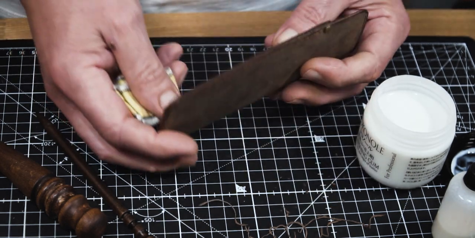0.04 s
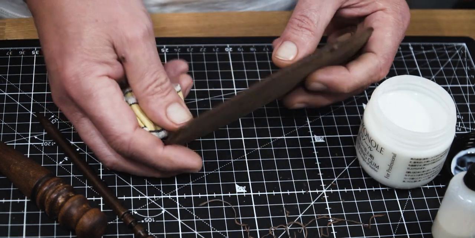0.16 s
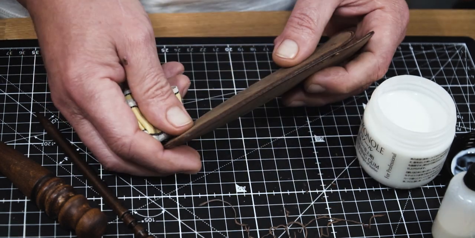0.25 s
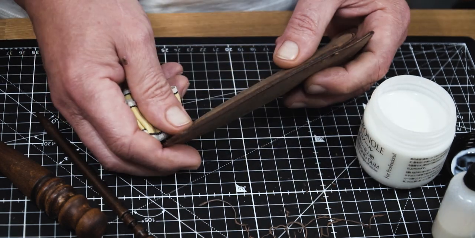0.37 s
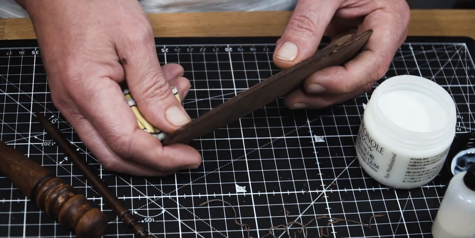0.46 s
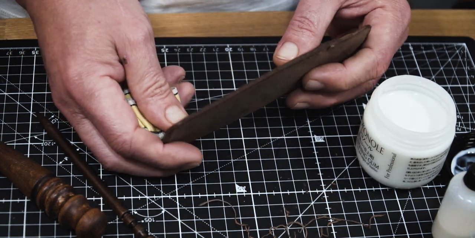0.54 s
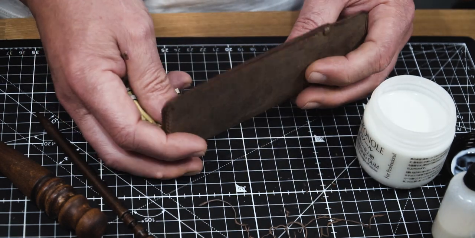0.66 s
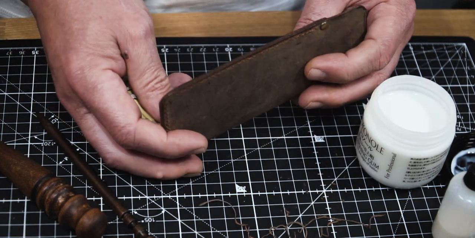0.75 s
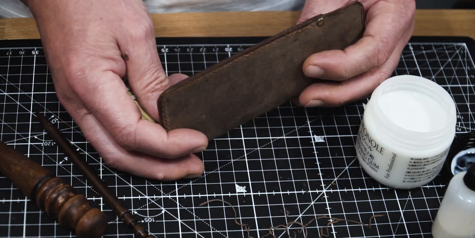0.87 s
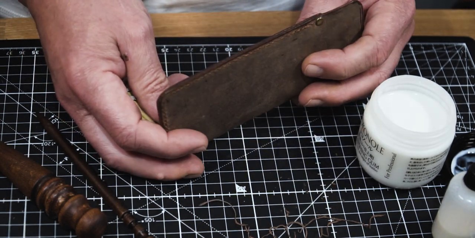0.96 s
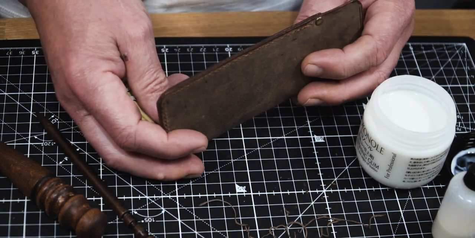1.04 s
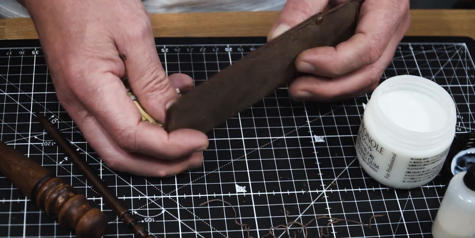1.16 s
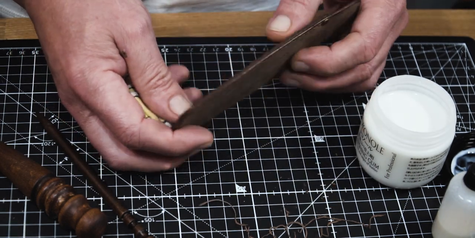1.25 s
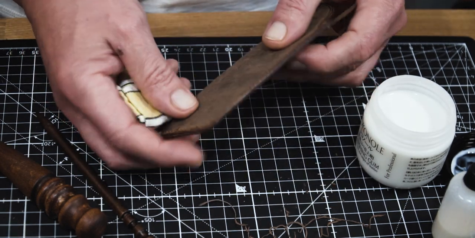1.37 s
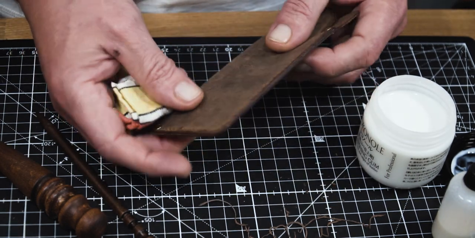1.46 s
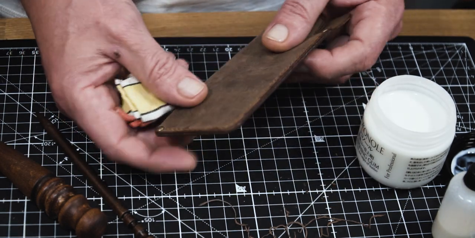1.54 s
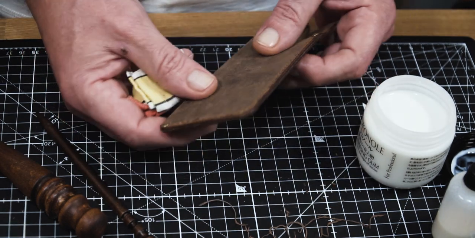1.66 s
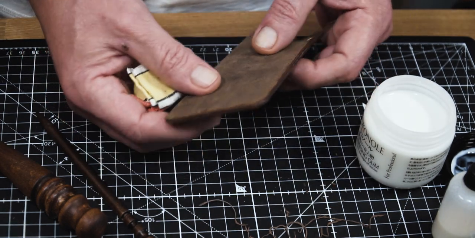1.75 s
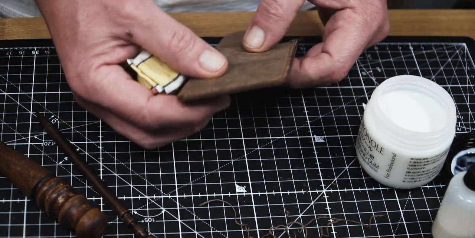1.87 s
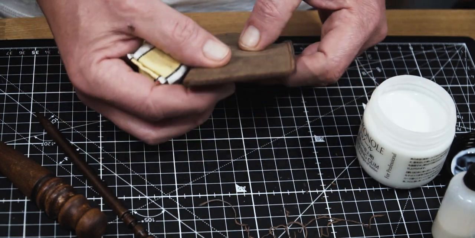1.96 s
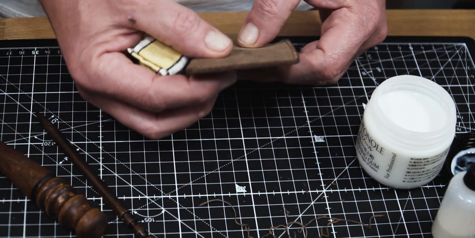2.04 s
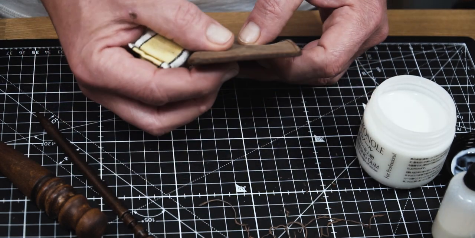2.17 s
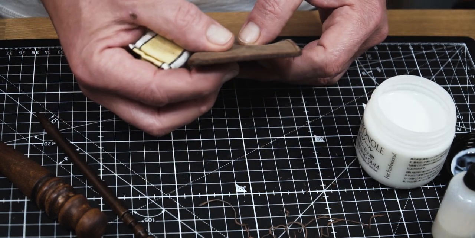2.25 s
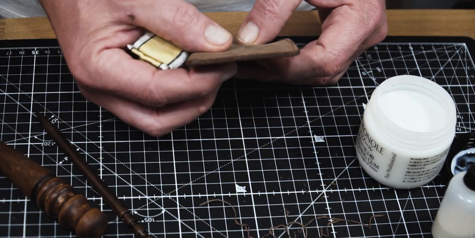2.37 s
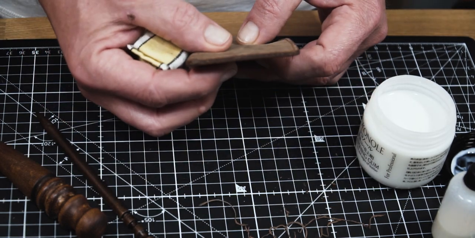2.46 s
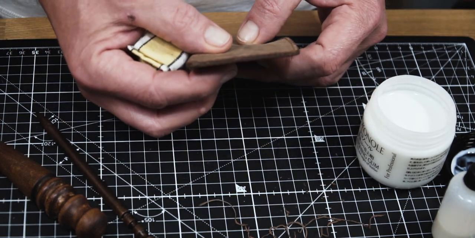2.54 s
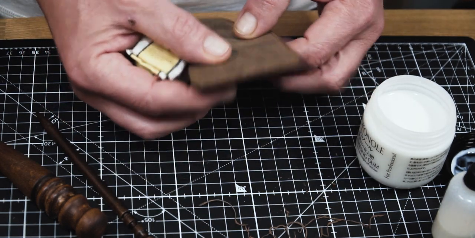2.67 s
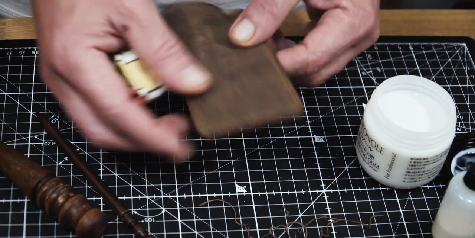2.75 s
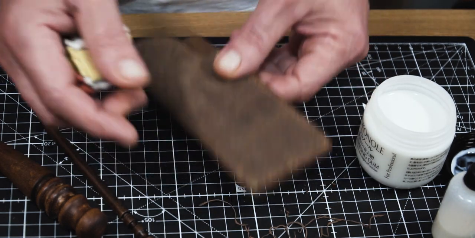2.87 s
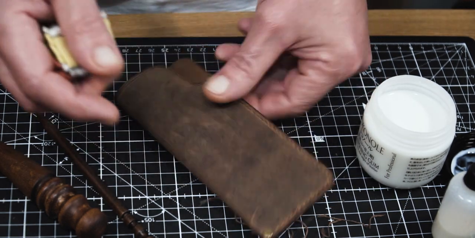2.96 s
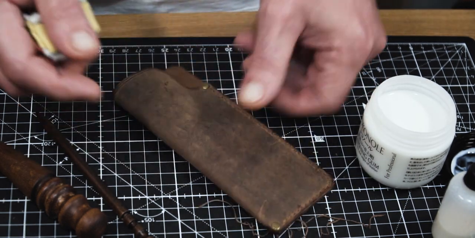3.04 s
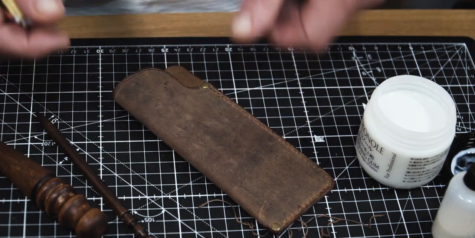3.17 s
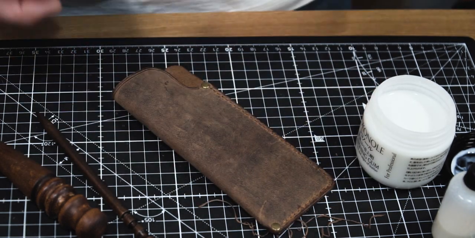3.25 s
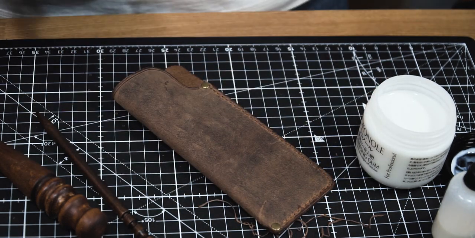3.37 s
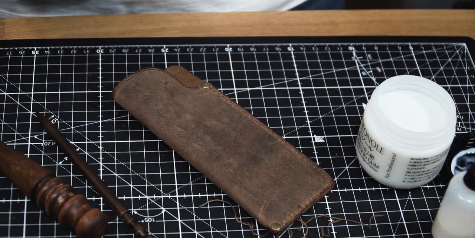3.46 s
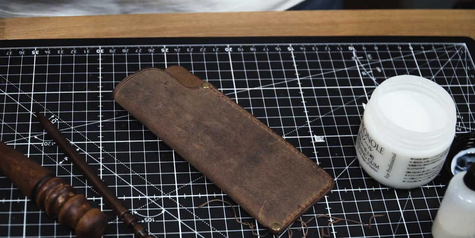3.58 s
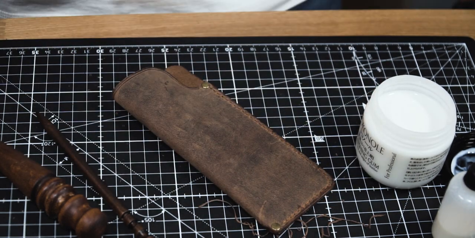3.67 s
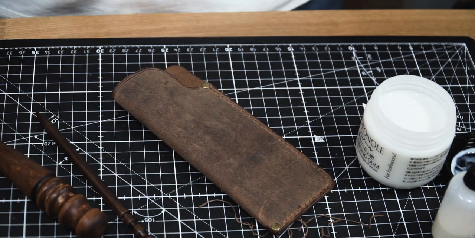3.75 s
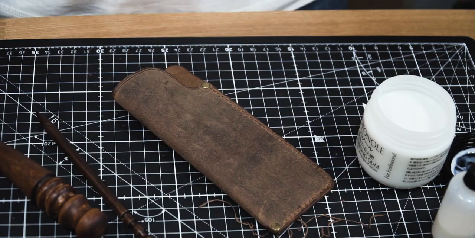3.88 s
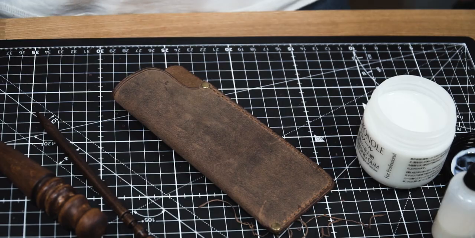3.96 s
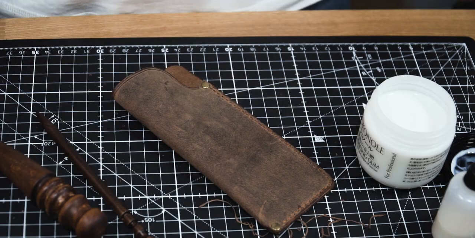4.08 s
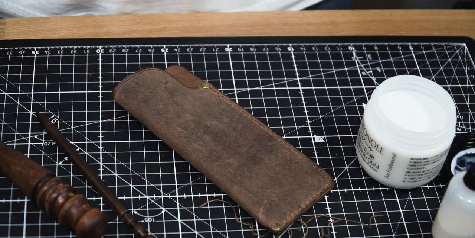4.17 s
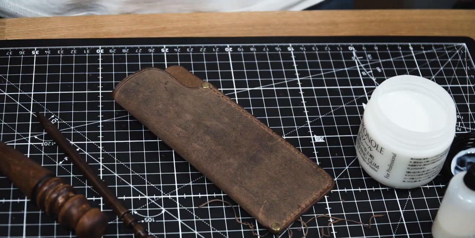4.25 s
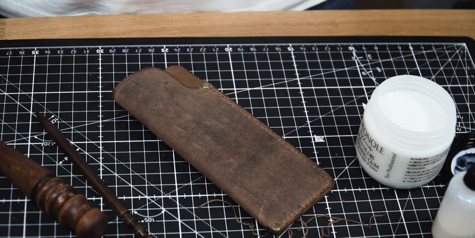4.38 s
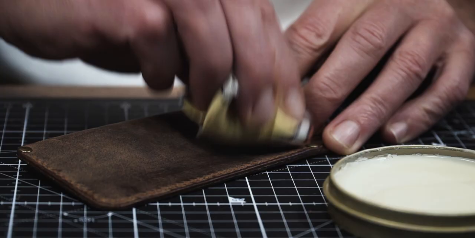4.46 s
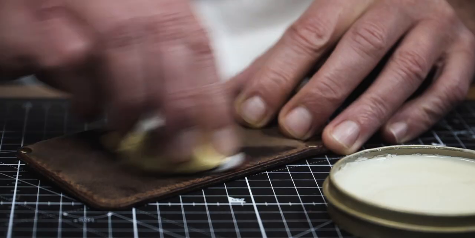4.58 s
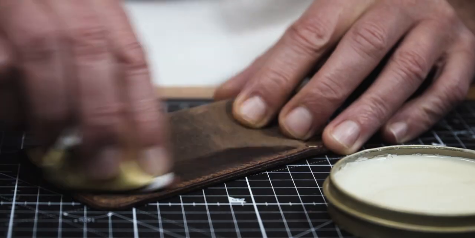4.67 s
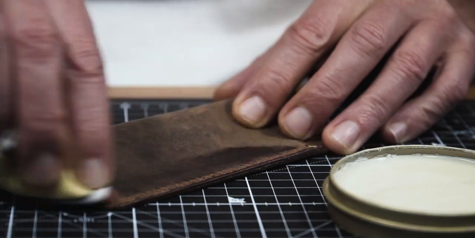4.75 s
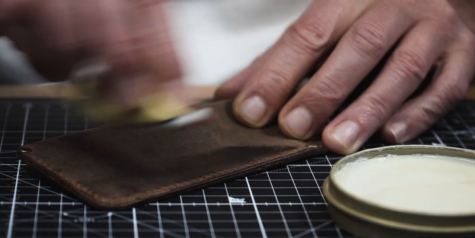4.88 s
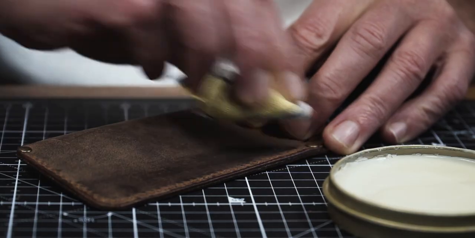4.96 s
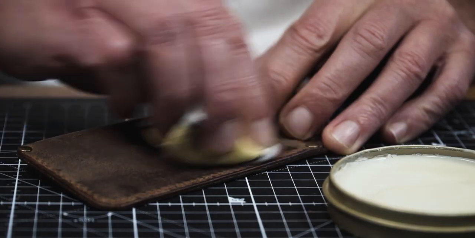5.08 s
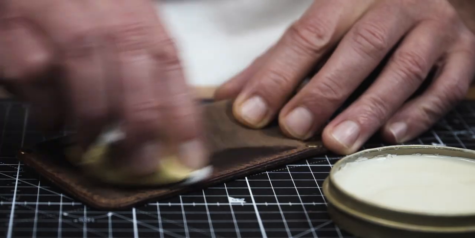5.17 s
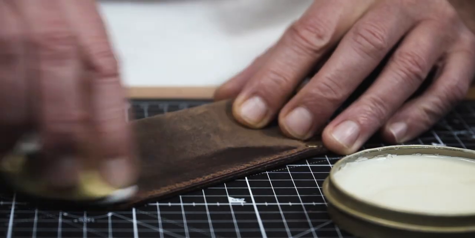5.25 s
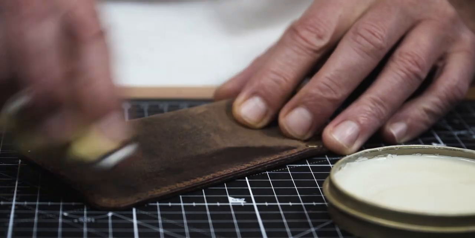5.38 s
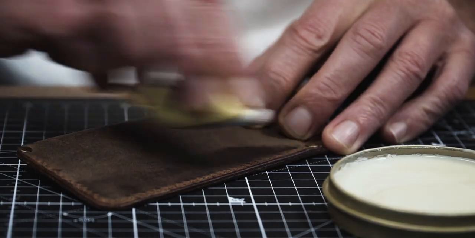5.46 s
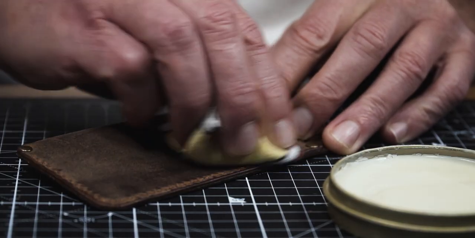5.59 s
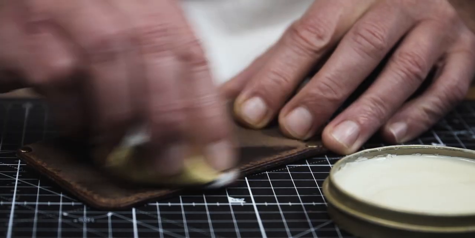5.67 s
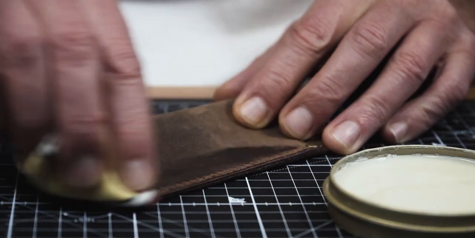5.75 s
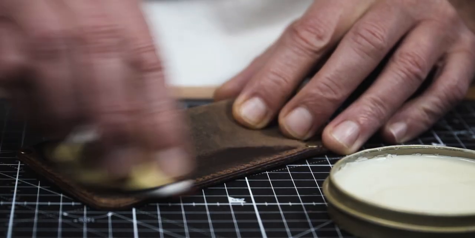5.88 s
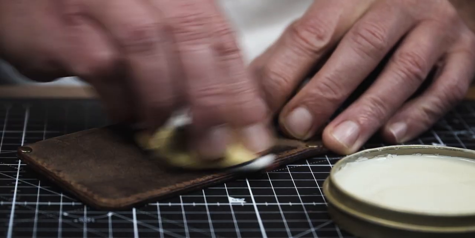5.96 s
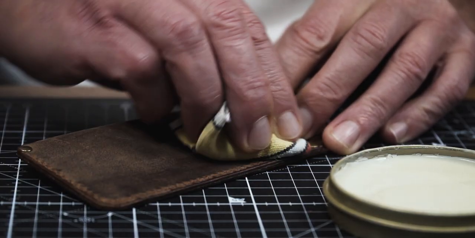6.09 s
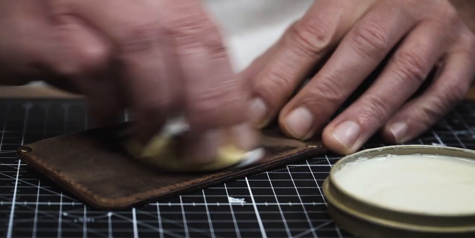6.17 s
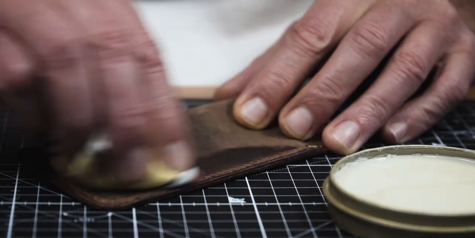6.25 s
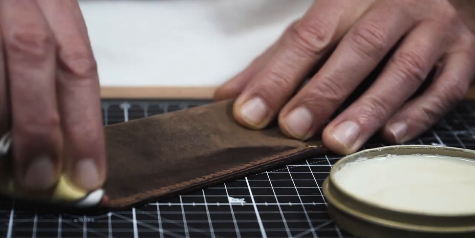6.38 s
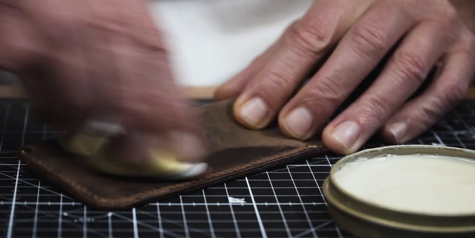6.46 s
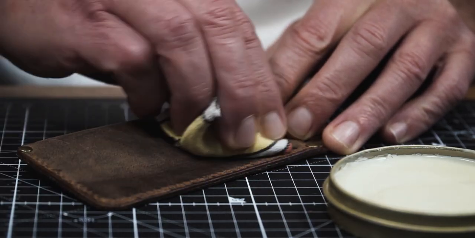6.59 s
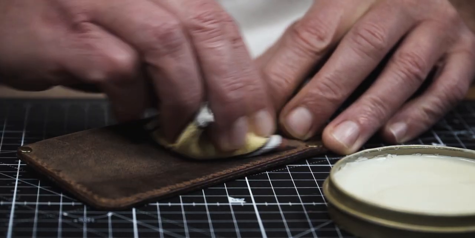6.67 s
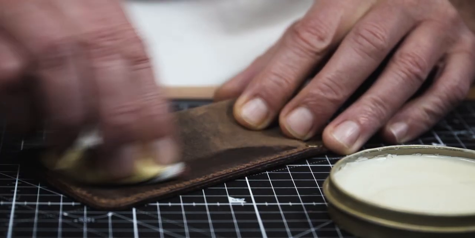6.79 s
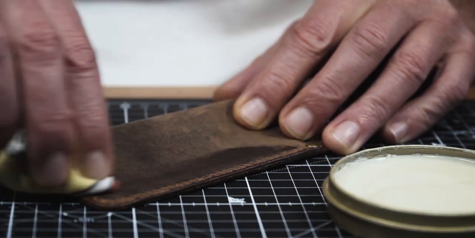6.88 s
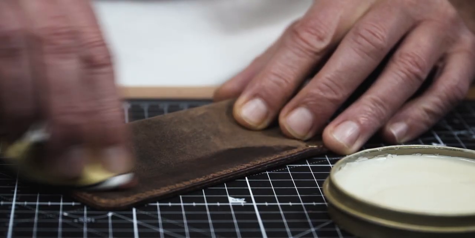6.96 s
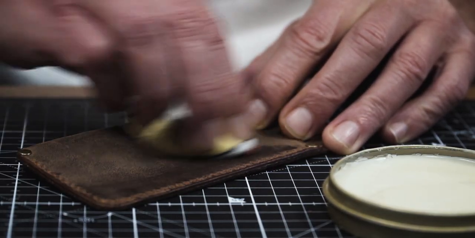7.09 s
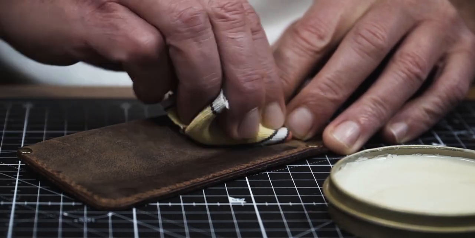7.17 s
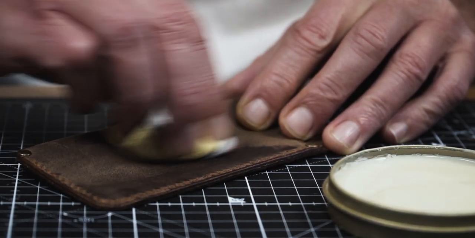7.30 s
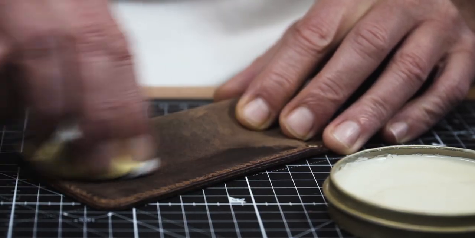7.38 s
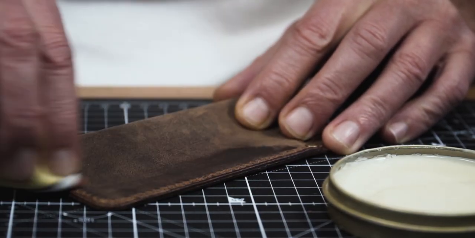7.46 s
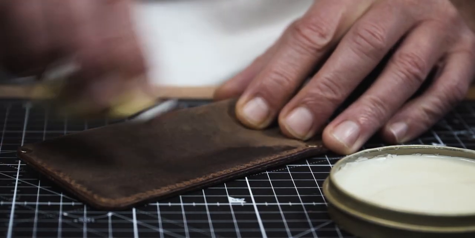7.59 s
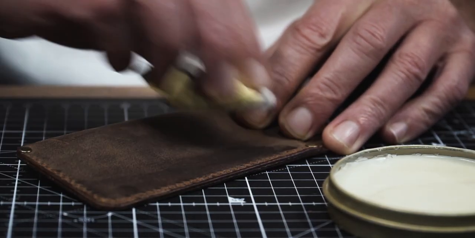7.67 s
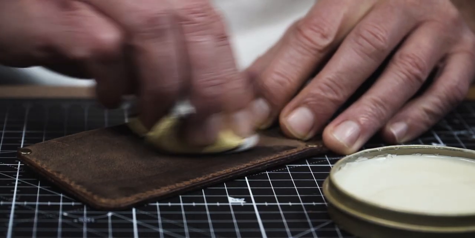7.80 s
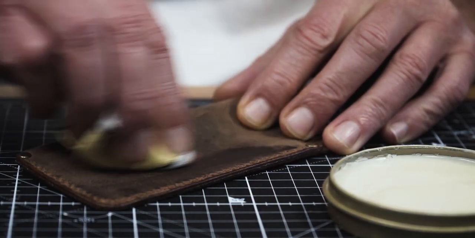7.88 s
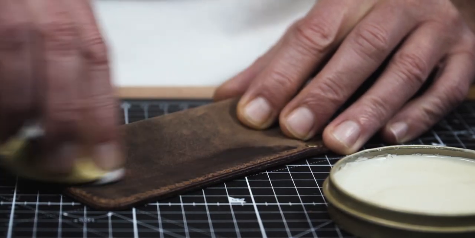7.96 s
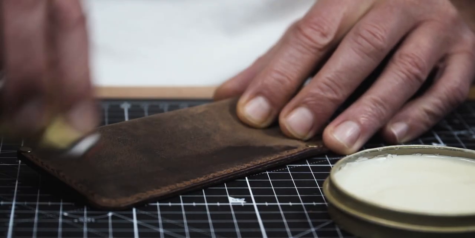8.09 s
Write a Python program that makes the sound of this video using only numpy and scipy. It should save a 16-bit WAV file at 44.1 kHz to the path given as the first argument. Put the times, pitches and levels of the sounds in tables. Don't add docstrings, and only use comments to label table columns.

```python
import sys
import numpy as np
from scipy import signal
from scipy.fft import rfft, irfft, next_fast_len
from scipy.io import wavfile

SR = 44100
rng = np.random.default_rng(int(sys.argv[2]) if len(sys.argv) > 2 else 0)


def unload_wav(signal):
    wavfile.write(
        sys.argv[1],
        SR,
        np.round(np.clip(np.atleast_2d(signal).T, -1, 1) * 32767).astype(np.int16),
    )


def volts_from_decibels(level):
    exponent = np.asarray(level, float) / 20
    return 10 ** exponent


N = 358533
STEP = 32
PAD = next_fast_len(N, True)
HZ = np.fft.rfftfreq(PAD, 1 / SR) + 1


# (loudest at [s], rise [s], fall [s], peak [dB], relative fine grain [dB])
SLIDES = [(.1, .15, .3, -60.5, -5), (.68, .08, .17, -70, -7), (.88, .08, .4, -84, -5),
          (1.235, .14, .26, -60, -6.5), (1.41, .1, .5, -60.5, -5), (1.56, .2, .3, -68, -4.5),
          (1.7, .3, .2, -69.5, -4), (1.875, .05, .2, -55, -5), (1.985, .16, .15, -51, -18),
          (2.08, .1, .17, -67, -25), (2.67, .09, .1, -55, -3), (2.78, .15, .4, -66, -6),
          (2.89, .3, .06, -71, -6), (2.99, .06, .02, -59, -4), (3.4, .2, .5, -75.5, -4),
          (3.76, .7, .45, -78, 3)]
# (loudest at [s], rise [s], fall [s], peak [dB])
FLEXES = [(0.0, .05, .1, -69), (.1, 0.35, 1.3, -74), (.685, .04, 0.22, -74), (1.25, .14, 0.24, -67.5),
          (1.41, .15, .6, -74), (1.7, .4, 0.42, -72), (1.86, .07, 0.018, -59.5), (1.9, 0.033, 0.22, -54.5),
          (2.62, 0.03, .06, -66.5), (2.675, 0.13, 0.12, -58), (2.79, 0.12, 0.13, -66.5),
          (2.99, 0.044, 0.023, -63), (3.42, 0.38, 0.12, -76), (3.7, .8, 1.08, -76.5)]
# (frequency [Hz], density [dB per Hz])
SKIN_SPECTRUM = [(880, -43), (1500, -20.5), (1840, -8), (2310, -7.5), (2930, -2.5), (4920, -6.5),
                 (5880, -10.5), (7300, -8), (10700, -23), (15700, -18.5)]
# (frequency [Hz], density [dB per Hz])
HOLLOW_SPECTRUM = [(260, -20), (450, -5.5), (670, 3), (794, -3), (1010, 1.5), (1600, -8.5), (2080, -35.5),
                   (3520, -120)]


def handling():
    power = np.array([swells([row]) ** 2 for row in SLIDES])
    fine_db = np.array(SLIDES)[:, -1] @ power / power.sum(axis=0)
    grains = slips(9000, 1.4, SKIN_SPECTRUM, patchy_db=2.5, count=8)
    slide = spread(swells(SLIDES)) * brighten(grains, spread(fine_db) + 3.0)
    hollow = slips(3600, 5.4, HOLLOW_SPECTRUM, patchy_db=5.0, count=5)
    return slide + spread(swells(FLEXES)) * hollow


# (start [s], length [s], hiss [dB], drag on the leather [dB], drag gained along the stroke [dB])
STROKES = [
    (4.592, 0.23, -44.5, -59.5, -9),
    (5.124, 0.23, -43, -56.5, -2),
    (5.656, .18, -42.5, -57.5, -3),
    (5.927, 0.16, -45, -57, 7),
    (6.193, 0.23, -42.5, -63.5, -8),
    (6.547, 0.11, -43, -55, -6),
    (6.75, 0.19, -42.5, -59, -4.5),
    (7.028, 0.19, -42, -59.5, 8),
    (7.305, 0.21, -43.5, -60, -9),
    (7.845, .24, -45, -60.5, -9.5),
]
# (loudest at [s], rise [s], fall [s], peak [dB])
GATHER = [
    (2.668, .07, .12, -52),
    (3.76, .9, .8, -74),
    (4.15, .13, .3, -58),
    (4.22, .25, .25, -52.5),
    (4.29, .25, .1, -53.5),
    (4.4, .02, .45, -77),
]
# (loudest at [s], rise [s], fall [s], drag [dB], relative hiss [dB])
SCUFFS = [
    (4.555, .015, .04, -67, -9),
    (5.074, .03, .045, -63, 8),
    (5.115, .02, .05, -64, 14),
    (5.603, .012, .04, -55, -6),
    (5.935, .025, .25, -68, 21),
    (6.535, .012, .04, -56, 8),
    (7.305, .02, .1, -60, 9),
    (7.55, .1, .17, -72, 17),
    (7.803, .02, .035, -58, -6),
]
# (frequency [Hz], density [dB per Hz])
CLOTH_SPECTRUM = [(1000, -45), (1700, -16.5), (1990, -6.5), (2890, -3), (5910, -5), (6800, -0.5),
                  (9150, -4.5), (9860, -9.5), (12100, -7.5), (15100, -11.5), (15700, -13)]
# (frequency [Hz], density [dB per Hz])
DRAG_SPECTRUM = [(260, -14), (450, -2.5), (476, -12), (1030, -0.5), (1690, -5), (2000, -8), (2600, -10),
                 (4400, -120)]


def strokes():
    start_s, stop_s = 0.035, 0.079
    slow_ends_db, drag_ends_db, weave_ends_db = 3.0, 2.5, 3
    gather = swells(GATHER)
    hiss_gain = gather + swells([(*row[:3], row[3] + row[4]) for row in SCUFFS])
    drag_gain = volts_from_decibels(-24) * gather + swells(SCUFFS)
    fine_db = np.full(len(gather), -4.5)
    for s, length, hiss_db, drag_db, gained_db in STROKES:
        along = np.clip(2 * (np.arange(0, N, STEP) / SR - s) / length - 1, -1, 1)
        moving = ramp(s, s + length, start_s, stop_s)
        stroke_hiss_db = hiss_db + 0.073 * gained_db * along - slow_ends_db * along ** 2
        stroke_drag_db = drag_db + gained_db * along / 2 - drag_ends_db * along ** 2
        hiss_gain = hiss_gain + moving * volts_from_decibels(stroke_hiss_db)
        drag_gain = drag_gain + moving * volts_from_decibels(stroke_drag_db)
        fine_db += np.sqrt(moving) * (1.0 - weave_ends_db * along ** 2)
    hiss = brighten(slips(25000, 1.2, CLOTH_SPECTRUM, patchy_db=1.9, count=8), spread(fine_db))
    drag = slips(5000, 2.33, DRAG_SPECTRUM, patchy_db=1.5, count=5)
    return spread(hiss_gain) * hiss + volts_from_decibels(1.83) * spread(drag_gain) * drag


def slips(per_s, uneven_db, spectrum, patchy_db, count):
    sizes = volts_from_decibels(uneven_db * np.minimum(rng.exponential(1, N), 5)) * rng.standard_normal(N)
    releases = sizes * (rng.random(N) < per_s / SR)
    place = np.clip(3 * np.log2(HZ / spectrum[1][0]), 0, count - 1)
    zones = np.clip(1 - np.abs(place - np.arange(count)[:, None]), 0, 1)
    parts = coloured(releases, spectrum, zone=zones)
    return rms_one(sum(volts_from_decibels(patchy_db * drift(8.2)) * part for part in parts))


def brighten(x, db):
    top = signal.sosfiltfilt(signal.butter(2, 5500, "high", fs=SR, output="sos"), x)
    body_gain = np.sqrt(np.clip(1.4 - volts_from_decibels(np.minimum(db, 0)) ** 2, .05, 2))
    return (x - top) * body_gain + volts_from_decibels(np.clip(db, -20, 3) + 3.5) * top


# (start [s], length [s], frequency [Hz], width [Hz], level [dB])
POCKETS = [(0.062, 0.14, 3740, 400, -66.5), (0.659, 0.1, 1034, 90, -67), (1.167, 0.16, 1900, 250, -65.5),
           (1.186, .074, 5200, 500, -63), (1.196, 0.065, 3070, 400, -66), (1.39, 0.064, 4180, 1500, -68),
           (1.502, 0.11, 1870, 280, -64.5), (1.561, 0.24, 1770, 400, -72.5), (1.505, 0.11, 6960, 900, -67),
           (1.918, 0.092, 4100, 400, -55.5), (2.972, 0.043, 1980, 600, -61),
           (2.992, 0.025, 1070, 500, -48.5), (3.039, 0.32, 1080, 170, -62), (3.804, .46, 1149, 69.4, -75),
           (5.388, 0.16, 1930, 603, -73.5), (5.919, 0.11, 360, 60, -60), (6.183, 0.21, 1280, 298, -58),
           (6.35, .47, 370, 72.5, -59), (6.4, .14, 1900, 700, -61), (6.859, .48, 349, 50, -63),
           (7.152, .11, 1230, 300, -59.5), (7.48, .094, 424, 178, -58), (8.043, 0.085, 546, 100, -62.5)]


def pockets():
    out = np.zeros(N + SR)
    for s, length, hz, width_hz, db in POCKETS:
        u = np.arange(round(length * SR)) / (length * SR)
        swell = np.sin(np.pi * u ** 0.73)
        out[round(s * SR):][:len(u)] += volts_from_decibels(db) * swell * narrow(hz, width_hz, size=SR // 2)[:len(u)]
    return out[:N]


# (time [s], peak [dB])
DROP = [
    (3.0115, -10),
]
# (frequency [Hz], level [dB], t60 [s])
CASE_MODES = [(640, -21.5, .03), (1900, -7, 0.013), (334, -18, 0.015), (234, -27.5, 0.53), (161, -34, 0.69),
              (280, -30, 0.5)]
# (frequency [Hz], density [dB per Hz])
SLAP_SPECTRUM = [(150, -5.5), (300, 5.5), (1000, 3), (1500, -4), (3000, -4), (5500, -9), (7000, -7),
                 (10000, -20), (16500, -22.5)]


def drop():
    s, peak_db = DROP[0]
    after = np.arange(N) / SR - s
    click = np.zeros(N)
    click[round(s * SR)] = -volts_from_decibels(peak_db)
    modes = sum(volts_from_decibels(db) * ring(click, hz, t60) for hz, db, t60 in CASE_MODES)
    squeeze = volts_from_decibels(-700 * np.clip(after, 0, 1) - 60 * np.clip(after - .005, 0, 1) / 0.009) * (after > 0)
    crack = volts_from_decibels(peak_db - 9.0) * squeeze * rms_one(coloured(rng.standard_normal(N), SLAP_SPECTRUM))
    edge = signal.sosfilt(signal.butter(2, [1500, 16000], "band", fs=SR, output="sos"), click)
    tick = signal.sosfilt(signal.butter(4, 8500, "high", fs=SR, output="sos"), click)
    settle = volts_from_decibels(-29) * np.roll(tick, round(.131 * SR))
    held = np.clip(after / 0.001, .7, 1) * volts_from_decibels(-60 * np.clip(after - .003, 0, 1) / 0.0038) * (after > 0)
    trapped = -volts_from_decibels(peak_db - 3.0) * held * np.sin(2 * np.pi * 1060 * after)
    near = trapped + modes + crack + volts_from_decibels(2.0) * edge + settle
    return near, coloured(click, SLAP_SPECTRUM)


# (time [s], peak [dB], pitch [Hz], contact [s], relative click [dB])
TAPS = [(1.845, -42, 3110, 0.0028, 1.5), (1.896, -24, 700, 0.0014, -8), (2.62, -51, 1073, 0.0028, -11.5),
        (2.786, -37, 1100, 0.0014, -6), (4.55, -42.5, 900, 0.0051, -13), (5.084, -37.5, 875, 0.0058, -11),
        (5.598, -40, 940, 0.005, -7), (5.603, -37, 1390, 0.0021, -6), (6.536, -45, 2560, 0.003, -7),
        (7.306, -36.5, 1020, 0.0024, -7), (7.789, -26, 1034, 0.0031, -14.5)]


def taps():
    out, t = np.zeros(N), np.arange(1024) / SR
    sharp_edge = volts_from_decibels(18.5) * (np.arange(1024) == 24)
    grit = rng.standard_normal((len(TAPS), 1024)) - sharp_edge
    cracks = signal.sosfilt(signal.butter(4, [1200, 4300], "band", fs=SR, output="sos"), grit)
    for (s, peak_db, hz, contact, click_db), crack in zip(TAPS, cracks):
        held = np.minimum(t / .0006, 1) * volts_from_decibels(-60 * np.maximum(t - 0.8 * contact, 0) / .007)
        pad_ring = np.sin(2 * np.pi * hz * t)
        out[round(s * SR):][:1024] += volts_from_decibels(peak_db - 4.5) * held * (volts_from_decibels(click_db) * crack - pad_ring)
    return out


# (time [s], bench top [dB], stand [dB], frame [dB])
JOLTS = [(0.04, -51, -59, -64), (0.073, -51, -41.5, -64), (0.195, -45.5, -48, -64), (1.85, -51, -45, -61),
         (1.898, -65, -62, -55), (3.01, -53, -25.5, -45), (4.551, -45, -32, -58.5),
         (5.085, -38, -32.5, -32), (5.599, -40, -30.5, -40), (6.536, -41.5, -32, -33),
         (7.3, -57.5, -59, -66), (7.788, -53, -30.5, -32)]
# (part 1 top 2 stand 3 frame [-], frequency [Hz], relative level [dB], t60 [s], signed gain [-])
BENCH_MODES = [(1, 89.6, 2, 0.99, -0.67), (2, 57, -4.5, 0.72, -1.16), (2, 62, -1.5, 0.19, 0.74),
               (3, 69, 1.5, 0.7, -0.48)]
# (time [s], level [dB])
LEANS = [(0.0, -66), (1.88, -61.5), (3.26, -48), (4.63, -43), (4.9, -44), (5.25, -43.5), (5.69, -37),
         (6.0, -45.5), (6.2, -50), (6.62, -34), (6.82, -36), (7.87, -42.5), (8.06, -55)]


def bench():
    stand_lag_s, stand_swell_s = .062, 0.044
    out, table = np.zeros(N), np.array(JOLTS)
    size = round(stand_swell_s * SR)
    for k, (part, hz, db, t60, sign) in enumerate(BENCH_MODES):
        clicks = np.zeros(N)
        clicks[np.round(table[:, 0] * SR).astype(int)] = sign * volts_from_decibels(table[:, round(part)] + db)
        if k == 1:
            burst = np.hanning(size) * np.cos(2 * np.pi * hz * np.arange(size) / SR) * 4 / size
            clicks = signal.fftconvolve(np.roll(clicks, round(stand_lag_s * SR)), burst)[:N]
        out += ring(clicks, hz, t60)
    out = signal.sosfilt(signal.butter(2, 130, fs=SR, output="sos"), out)
    rocking = volts_from_decibels(-69) + swells([(s, 0.21, 0.84, db) for s, db in LEANS])
    return out + spread(rocking) * narrow(22, 9.0)


# (frequency [Hz], t60 [s])
ROOM_DECAY = [(150, 0.35), (1000, 0.4), (8000, 0.44), (15000, 0.3)]


def workshop(x):
    t, edges = np.arange(SR // 2) / SR, np.geomspace(100, 17000, 9)
    tail = 0
    for low, high in zip(edges, edges[1:]):
        band_filter = signal.butter(2, [low, high], "band", fs=SR, output="sos")
        band = signal.sosfilt(band_filter, rng.standard_normal(len(t)))
        tail = tail + band * volts_from_decibels(-60 * t / at_hz(ROOM_DECAY, np.sqrt(low * high)))
    tail = tail * np.clip((t - .004) / 0.0073, 0, 1)
    return signal.fftconvolve(x, tail / np.sqrt(np.sum(tail ** 2)))[:N]


# (frequency [Hz], density [dB per Hz])
AIR_SPECTRUM = [(30, -3), (100, -3.5), (120, -9), (160, -3.5), (250, 0.5), (330, -0.5), (440, -0.5),
                (520, -10), (700, -14.5), (1100, -17), (2000, -20.5), (4000, -31.5), (8000, -31.5),
                (13000, -33.5)]
# (frequency [Hz], level [dB], 20 dB weaker from [s])
HUMS = [(230, -67.5, 3.1), (288.5, -71, 9.9), (90, -76, 3.6)]
# (frequency [Hz], rms level [dB])
LAMP_LINES = [(796.7, -87.5), (1066, -90), (4484, -91.5), (5523, -104), (8285, -101), (8629, -101)]


def background():
    t, wobble_db = np.arange(N) / SR, 1.2
    air = volts_from_decibels(-68) * rms_one(coloured(rng.standard_normal(N), AIR_SPECTRUM, skirt_db=-44))
    out = signal.sosfilt(signal.butter(8, 13500, fs=SR, output="sos"), air)
    for hz, db, stop in HUMS:
        level = volts_from_decibels(db + wobble_db * drift(4.5)) * np.clip((stop - t) / 0.2, .1, 1)
        out = out + level * np.sin(2 * np.pi * np.cumsum(hz + 1.494 * drift(1.5)) / SR)
    lines = sum(volts_from_decibels(db + 2.0 + wobble_db * drift(1.5)) * np.sin(2 * np.pi * hz * t) for hz, db in LAMP_LINES)
    return out + lines * np.clip(7.0 - t, .3, 1)


def rms_one(x):
    return x / np.sqrt(np.mean(x ** 2) + 1e-20)


def at_hz(points, hz):
    return np.interp(np.log(hz), np.log(np.array(points)[:, 0]), np.array(points)[:, 1])


def coloured(x, spectrum, skirt_db=-24, zone=1):
    below = np.maximum(np.log2(spectrum[0][0] / HZ), 0)
    above = np.maximum(np.log2(HZ / spectrum[-1][0]), 0)
    gain = volts_from_decibels(at_hz(spectrum, HZ) + skirt_db * (below + above))
    return irfft(rfft(x, PAD) * gain * zone, PAD)[..., :N]


def drift(rate):
    r = np.exp(-80 * np.pi * rate / SR)
    slow = signal.lfilter([1], [1, -2 * r, r * r], rng.standard_normal(N // 40 + 2002))[2000:]
    return np.interp(np.arange(N) / 40, np.arange(len(slow)), rms_one(slow))


def ring(clicks, hz, t60):
    r, w = volts_from_decibels(-60 / (t60 * SR)), 2 * np.pi * hz / SR
    return signal.lfilter([0, np.sin(w)], [1, -2 * r * np.cos(w), r * r], clicks + 1e-18)


def narrow(hz, width_hz, size=N):
    return rms_one(ring(rng.standard_normal(size + 4096), hz, 3.8 / width_hz)[4096:])


def ramp(start, end, rise, fall):
    t = np.arange(0, N, STEP) / SR
    away = np.maximum((start - t) / max(rise, .003), (t - end) / max(fall, .003))
    return volts_from_decibels(-30 * np.clip(away, 0, 4))


def swells(rows):
    return np.sqrt(sum((volts_from_decibels(row[3]) * ramp(row[0], row[0], row[1], row[2])) ** 2 for row in rows))


def spread(slow):
    return np.interp(np.arange(N), np.arange(0, N, STEP), slow)


def scene():
    rub = handling() + strokes() + pockets()
    slap, slap_far = drop()
    touch = taps()
    room = workshop(volts_from_decibels(-19.5) * rub + volts_from_decibels(18.0) * slap_far + volts_from_decibels(-10.0) * touch)
    low_pass = signal.cheby2(20, 50, 16000, fs=SR, output="sos")
    steady = signal.sosfilt(low_pass, rub + room + background())
    return np.tile(steady + slap + touch + bench(), (2, 1))


def top_cut(x):
    return signal.sosfilt(signal.butter(12, 17090, fs=SR, output="sos"), x)


def record(dry):
    hiss_band = signal.butter(4, [4000, 9600], "band", fs=SR, output="sos")
    hiss = signal.sosfilt(hiss_band, rng.standard_normal(N))
    dry = signal.sosfilt(signal.cheby2(16, 60, 17100, fs=SR, output="sos"), dry)
    mix = dry + volts_from_decibels(-92.0) * hiss * [[1], [-1]]
    return top_cut(mix)


dry = scene()
out = record(dry)
unload_wav(out)
```